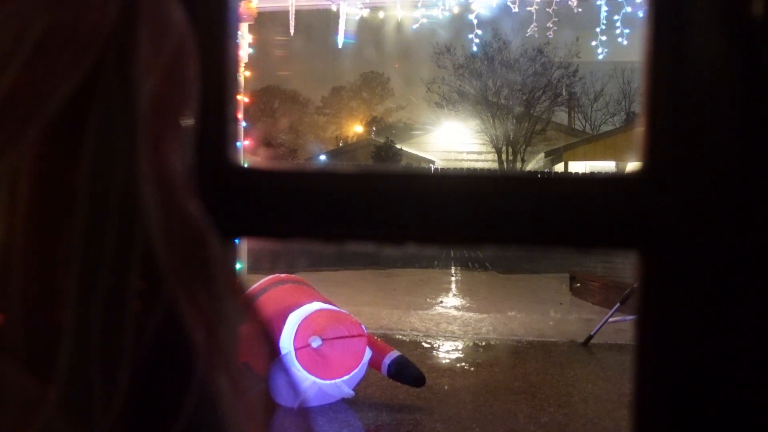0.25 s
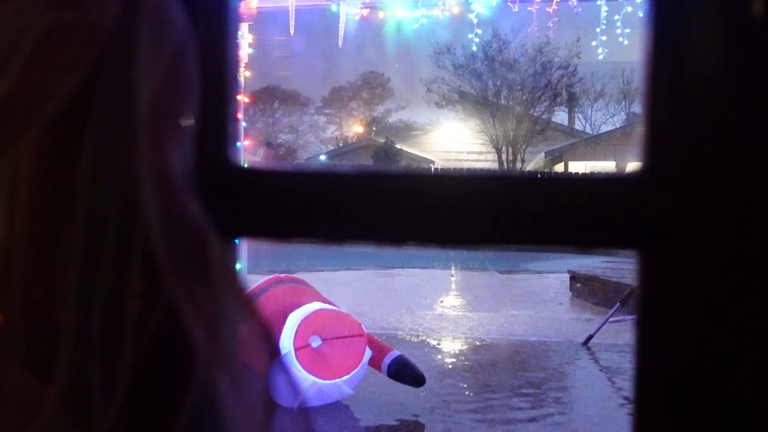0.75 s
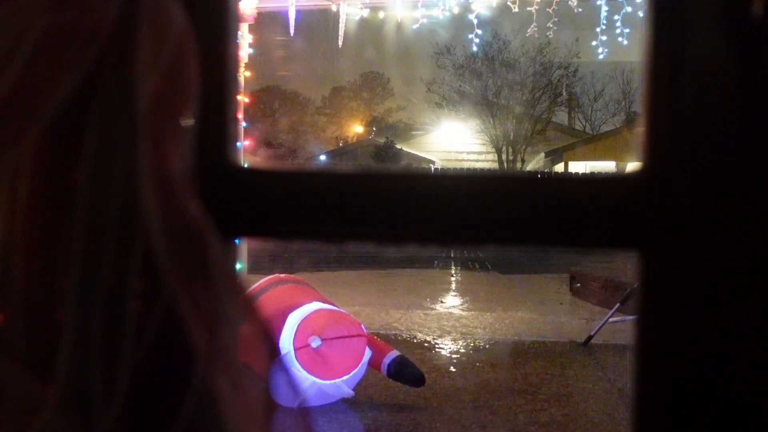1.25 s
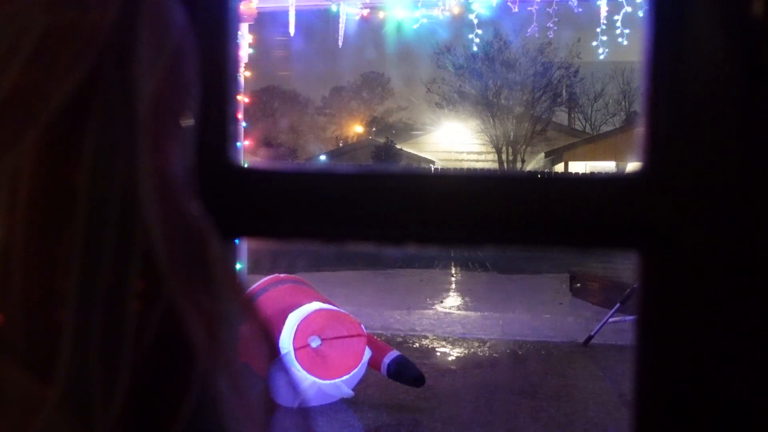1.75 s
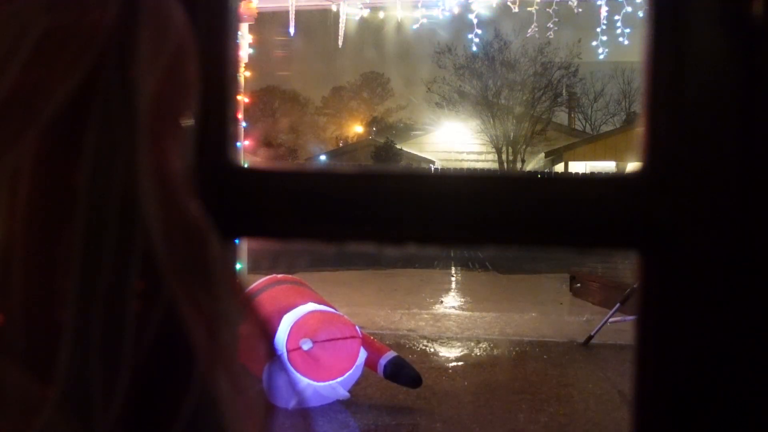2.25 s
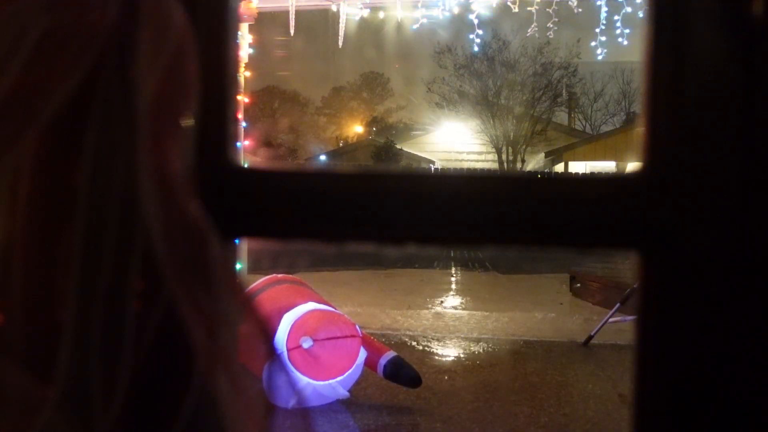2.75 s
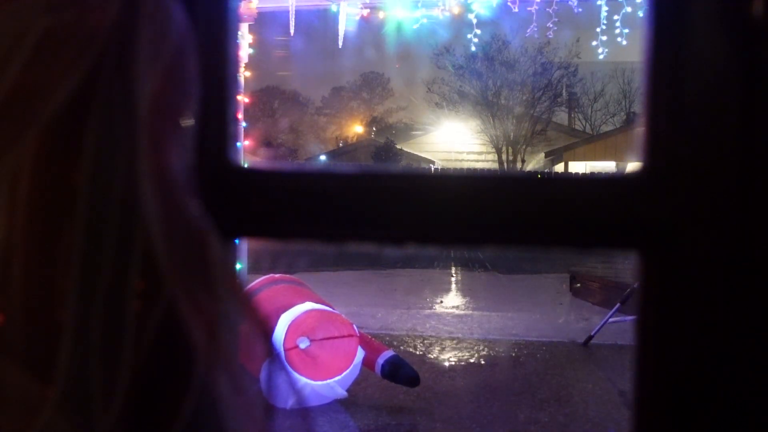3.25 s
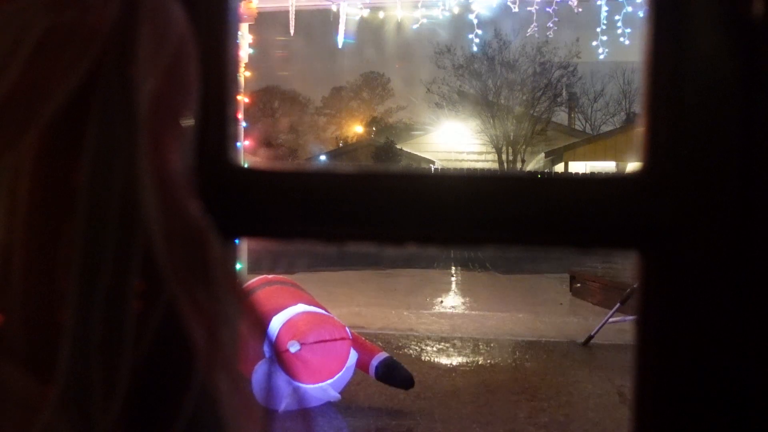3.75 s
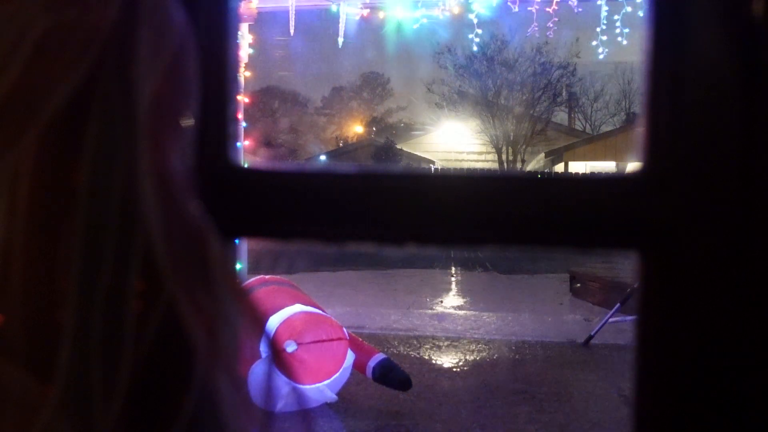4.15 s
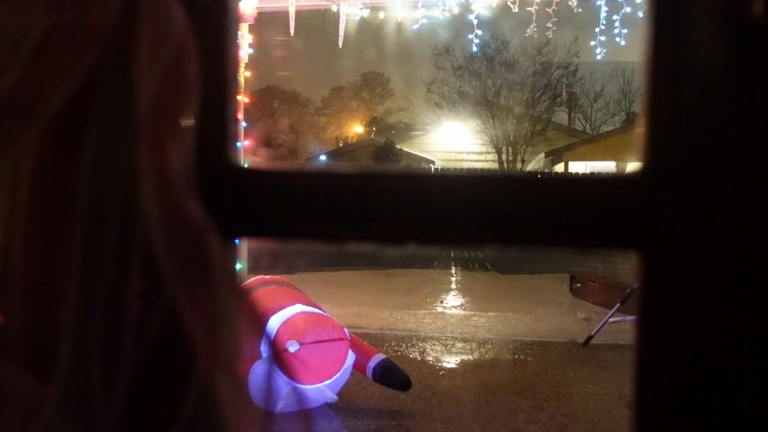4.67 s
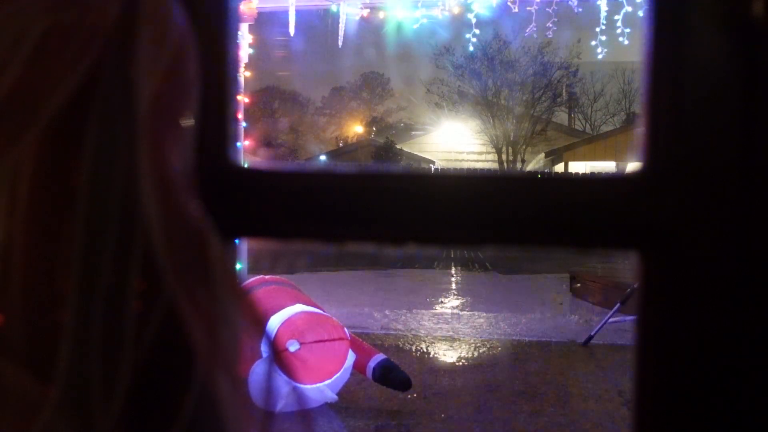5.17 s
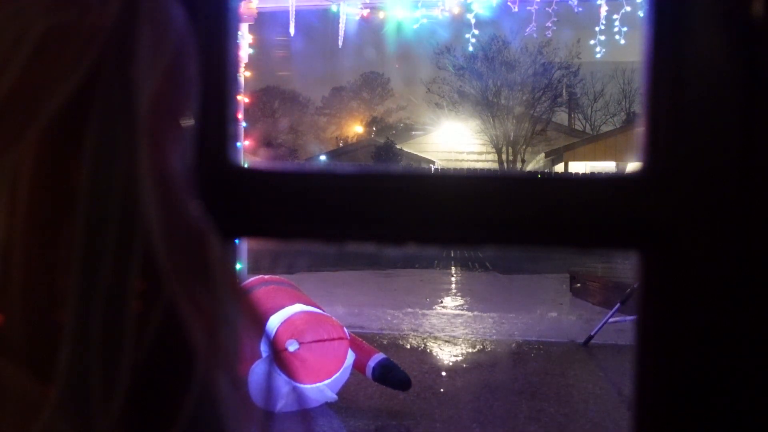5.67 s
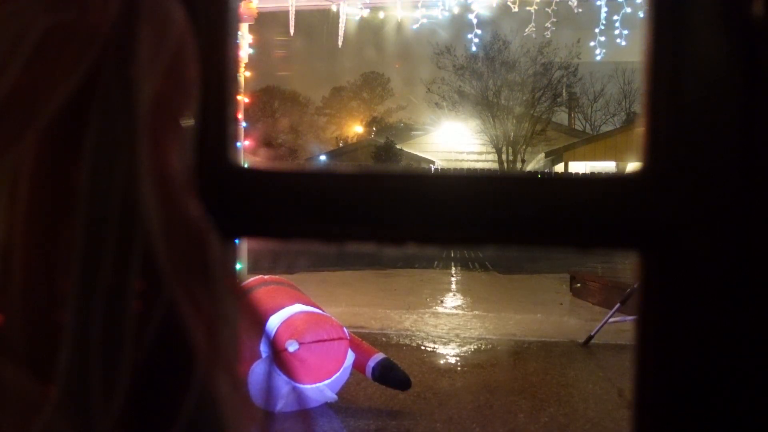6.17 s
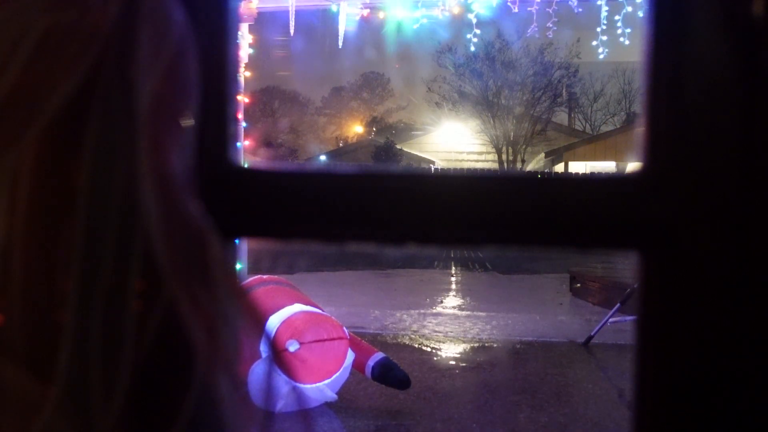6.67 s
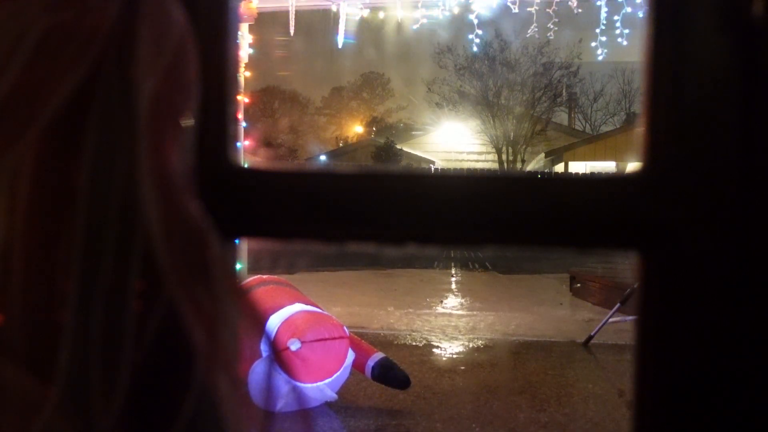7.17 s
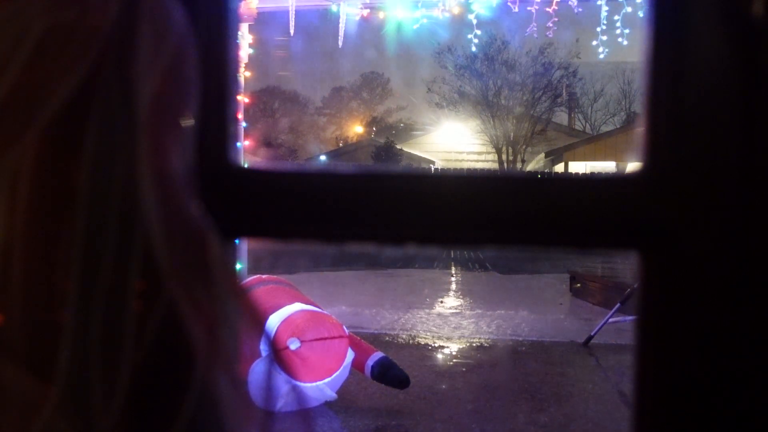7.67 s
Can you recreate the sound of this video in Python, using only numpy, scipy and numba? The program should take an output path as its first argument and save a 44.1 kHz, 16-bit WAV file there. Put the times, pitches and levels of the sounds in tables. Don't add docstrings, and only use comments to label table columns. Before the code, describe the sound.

From indoors, a steady downpour fizzes behind glass while close drops splat and plop, a faint fan hums, and far thunder rolls softly.

```python
import sys
import numpy as np
from scipy import signal
from scipy.fft import rfft, irfft
from scipy.io import wavfile
from scipy.ndimage import uniform_filter1d
from numba import njit

SR = 44100
rng = np.random.default_rng(int(sys.argv[2]) if len(sys.argv) > 2 else 0)


def magnitude_from_level(level_db):
    exponent = np.asarray(level_db, float) / 20
    return 10 ** exponent


def wrap_up_sound(samples):
    columns = np.atleast_2d(samples).T
    tamed = np.clip(columns, -1, 1)
    steps = np.round(tamed * 32767).astype(np.int16)
    wavfile.write(sys.argv[1], SR, steps)


N = 349272
T = np.arange(N) / SR
HZ = np.maximum(np.arange(N // 2 + 1) * SR / N, 1)

# (time [s], strength [dB], heaviness of the drops [dB])
DOWNPOUR = [(0, -42, -3.5), (.4, -43, -3.5), (.8, -44, -1), (1.3, -42, -4), (1.8, -44, -2.5),
            (2.3, -42.5, -3), (2.9, -44, -2.5), (3.3, -43, -4), (3.8, -42.5, -3.5), (4.3, -42, -3),
            (5, -44, -2), (5.4, -42.5, -3.5), (5.75, -44, -3), (6.15, -42, -4.5), (6.8, -44, -5),
            (7.15, -43, -4), (7.4, -44, -4), (7.92, -43, -4)]
# (time [s], peak [dB], low ring [Hz], high ring [Hz])
SILL_DRIPS = [
    (3.9725, -29, 2400, 3950),
    (4.6820, -19.5, 2350, 4600),
    (5.3172, -23, 3350, 4900),
]


def level(x, db):
    return x * magnitude_from_level(db) / np.sqrt(np.mean(x ** 2))


def curve(table):
    s, *columns = np.transpose(table)
    return [np.interp(T, s, c) for c in columns]


def shape(points, hz=HZ):
    f, db = np.transpose(points)
    return np.interp(np.log(hz), np.log(f), db)


def colour(x, gain):
    return irfft(rfft(x) * gain, N)


def walk(rate):
    hold = int(SR / rate)
    w = np.repeat(rng.standard_normal(N // hold + 1), hold)
    w = uniform_filter1d(uniform_filter1d(w, hold), hold)[:N]
    return w / w.std()


def bands(x, cross_hz, levels_db):
    edges = [0] + [1 / (1 + (HZ / f) ** 12) for f in cross_hz] + [1]
    spectrum = rfft(x)
    out = np.zeros(N)
    for below, above, db in zip(edges, edges[1:], levels_db):
        band = irfft(spectrum * (above - below), N)
        out += level(band, 0) * magnitude_from_level(db)
    return out


@njit
def grains(start, hz, cycles, glide, size):
    out = np.zeros(N)
    for k in range(len(start)):
        w = 2 * np.pi * hz[k] / SR
        n = cycles[k] * SR / hz[k]
        fade, rise = np.exp(-1 / n), glide[k] ** (1 / n)
        phase, a = 0., size[k]
        for i in range(int(start[k]), min(N, int(start[k] + 5 * n))):
            phase += w
            w = min(w * rise, 3.)
            a *= fade
            out[i] += a * np.sin(phase)
    return out


def drops(count, lo_hz, hi_hz, cycles, glide, scatter_db):
    when, pitch, bigness, ring = rng.random((count, 4)).T
    hz = lo_hz + (hi_hz - lo_hz) * pitch
    extra_db = np.minimum(-scatter_db * np.log(1 - bigness), 9)
    size = magnitude_from_level(extra_db) * np.sqrt(hz)
    return level(grains(when * N, hz, cycles * (.5 + ring), glide + 0 * hz, size), 0)


def door():
    # (frequency [Hz], level [dB per Hz])
    passed = [(470, -50.5), (800, -15.5), (1080, -16.5), (1350, -10.5), (1490, -9), (2190, -2.5),
              (2420, -2), (3700, 1.5), (4870, 3.5), (8960, 4), (15700, -14)]
    # (frequency [Hz], width [Hz], gain [dB])
    resonances = [(1380, 26, 4.5), (1780, 34, 1), (1850, 13, 5), (2170, 60, 3), (2260, 44, 4.5),
                  (2935, 69, 3), (2430, 110, 5), (2710, 126, 5.5), (3088, 43, 5.5), (3280, 114, 6),
                  (3960, 28, 1.5), (4630, 150, -0.5), (4940, 220, 0.5), (5340, 200, -1)]
    hz = np.maximum(np.arange(2049) * SR / 4096, 1)
    db = shape(passed, hz)
    for f, width, gain_db in resonances:
        db = db + gain_db / (1 + (2 * (hz - f) / width) ** 2)
    cep = irfft(db * np.log(10) / 20)
    cep[1:2048] *= 2
    cep[2049:] = 0
    return irfft(np.exp(rfft(cep)))[:2048]


def sheets():
    # (time [s], swell [dB])
    gusts = [(0.07, 2), (0.72, 3), (1.38, 2.5), (1.88, 4), (2.2, 0.5), (2.83, 2), (3.08, 2.5), (3.47, 5),
             (7.68, 1), (6.86, 4), (3.66, -1), (4.18, 1.5), (4.68, 5.5), (4.93, 7), (5.07, 9), (5.32, 3.5),
             (5.79, 4), (6.46, 3.5), (7.05, 8)]
    rise_s, fall_s = 0.014, 0.048
    swell_db = np.zeros(N)
    for s, db in gusts:
        age = np.maximum(T - s, 0)
        swell_db += db * (1 - np.exp(-age / rise_s)) * np.exp(-age / fall_s)
    return swell_db


def rain(glass):
    hiss = rng.standard_normal(N)
    fizz = drops(count=14000, lo_hz=1044, hi_hz=14900, cycles=2.7, glide=1.023, scatter_db=2.5)
    bubbles = drops(count=3000, lo_hz=1190, hi_hz=6040, cycles=7.7, glide=1.05, scatter_db=4.5)
    outdoors = hiss + magnitude_from_level(-9.0) * fizz + magnitude_from_level(-15) * bubbles
    indoors = signal.fftconvolve(outdoors, glass)[:N]
    strength_db, heavy_db = curve(DOWNPOUR)
    gust_db = sheets()
    steady_db = -43
    patter_db = strength_db + heavy_db + 0.63 * gust_db - 0.3 + .6 * walk(36) + 0.66 * walk(9)
    middle_db = strength_db - 1.6 + 0.5 * gust_db + .5 * walk(24) + 0.41 * walk(9)
    spray_db = -49.5 + 0.89 * gust_db + 1.33 * (strength_db - steady_db) + 0.5 * walk(32) + 0.55 * walk(8)
    flicker = magnitude_from_level(0.56 * walk(36) + 0.39 * walk(70))
    return flicker * bands(indoors, (2600, 6000), (patter_db, middle_db, spray_db))


def rumble():
    # (time [s], deep roll [dB], how hard it shakes the roof [dB])
    rolls = [(0, -65, 0), (.95, -61, 0), (1.2, -64, -1.5), (2.2, -67, -0.5), (2.72, -70, 5.5),
             (2.82, -55, 1), (3.25, -51, 7), (3.6, -54, 5), (3.9, -50, 6), (4.15, -57, 1), (4.4, -52, 0.5),
             (4.6, -62, 5.5), (5.15, -56, 1.5), (5.4, -65, -2), (5.8, -60, -5), (6.08, -55, 3.5),
             (6.35, -59, -1), (7.92, -67, -7)]
    # (frequency [Hz], level [dB per Hz])
    low_end = [(18, -48), (36, -35), (46, -22.5), (64, -21), (77, -10.5), (140, -5), (183, -9), (235, -1.5),
               (290, -3.5), (390, -15), (445, -10.5), (700, -15.5), (1000, -26.5), (1500, -35.5)]
    roll_db, shake_db = curve(rolls)
    heavy_db = curve(DOWNPOUR)[1]
    steady_db = -58
    noise = colour(rng.standard_normal(N), magnitude_from_level(shape(low_end)))
    deep_db = roll_db - .6 + 1.5 * walk(6)
    thunder_db = -53 + 0.82 * shake_db + .1 * (roll_db - steady_db) + 1.0 * walk(7.7)
    roof_db = -50.0 + .45 * shake_db + .5 * walk(12)
    street_db = -57.5 - 0.13 * shake_db + 0.98 * heavy_db + 0.42 * walk(4.3)
    return bands(noise, (92, 165, 420), (deep_db, thunder_db, roof_db, street_db))


def fan():
    fan_hz, width_hz = 155, 6.5
    air = colour(rng.standard_normal(N), 1 / (1 + ((HZ - fan_hz) / width_hz) ** 2))
    tone = np.sin(2 * np.pi * fan_hz * T) * magnitude_from_level(1.1 * walk(3.66))
    return level(level(air, 0) + magnitude_from_level(4) * tone, -55)


def splashes(table, count, cycles, glide, spread_oct, trim_db, burst_s):
    s, peak_db, hz = np.transpose(table)[:, :, None]
    c = rng.random((len(s), count, 2))
    c[:, 0] = 0, .5
    delay, detune = c[..., 0], c[..., 1]
    drip_s = np.transpose(SILL_DRIPS)[0]
    on_sill = abs(s - drip_s).min(axis=1, keepdims=True) < .003
    peak_db = peak_db - 8 * on_sill
    late = delay ** 1.1 * burst_s + .0006
    pitch = hz * 2 ** (spread_oct * (detune - .5))
    size = magnitude_from_level(peak_db + trim_db - 17.0 * delay).ravel()
    return grains((s + late).ravel() * SR, pitch.ravel(), cycles + 0 * size, glide + 0 * size, size)


def lesser(count, top_db, range_db, lo_hz, hi_hz):
    when, softness, pitch = rng.random((count, 3)).T
    s = when * (N - SR // 20) / SR
    return np.transpose([s, top_db - range_db * softness, lo_hz * (hi_hz / lo_hz) ** pitch])


def splats():
    # (time [s], peak [dB], centre [Hz])
    bursts = [(0.2543, -27.5, 3910), (0.6769, -22, 4800), (0.7627, -23, 3960), (1.2286, -27, 3930),
              (0.1, -22, 3300), (1.8826, -32, 5250), (2.2917, -25, 3980), (2.8604, -19, 4730),
              (3.1308, -22, 3700), (3.4845, -19.5, 4450), (3.6532, -21.5, 3370), (3.875, -22, 3960),
              (3.973, -9, 3920), (4.0612, -20, 4540), (4.1824, -22, 4470), (4.4333, -21, 3950),
              (4.6808, -9, 4360), (4.7202, -20, 4800), (4.8678, -22, 3080), (4.9516, -22, 3330),
              (5.0058, -27, 3330), (5.3168, -11, 4300), (5.4111, -15, 5950), (5.5972, -21, 4440),
              (6.336, -20, 4800), (6.467, -31, 3090), (7.1821, -18.5, 5260), (7.0753, -22, 3100),
              (7.7011, -23.5, 3460), (7.7209, -20, 5240)]
    paving = np.vstack([bursts, lesser(count=28, top_db=-31, range_db=31, lo_hz=2940, hi_hz=5200)])
    return splashes(paving, count=16, cycles=2.6, glide=0.93, spread_oct=0.58, trim_db=-10, burst_s=.015)


def gulps():
    # (time [s], peak [dB], bubble pitch [Hz])
    deep = [(0.247, -32, 1700), (0.2922, -35, 2430), (0.315, -33, 1950), (0.7093, -37, 1790),
            (0.7567, -38, 1850), (1.288, -31, 1960), (1.348, -32.5, 1850), (1.8312, -31, 1800),
            (1.931, -27.5, 1780), (1.9689, -36, 1660), (3.0425, -30, 1380), (3.0776, -34, 1700),
            (4.9766, -31, 1940), (5.1183, -35, 1970), (7.1, -37, 2250)]
    return splashes(deep, count=5, cycles=4.8, glide=1.04, spread_oct=0.53, trim_db=-4.5, burst_s=.021)


def plops():
    # (time [s], peak [dB], bubble pitch [Hz])
    shallow = [(0.4708, -24, 2380), (0.6918, -24, 2260), (1.077, -21, 2430), (1.3159, -22.5, 2500),
               (1.4875, -21, 2500), (1.5434, -19.5, 2430), (1.8317, -25, 2130), (1.8841, -26, 2190),
               (2.0303, -20, 2330), (2.2258, -28, 2260), (2.3191, -19, 2330), (2.8095, -22, 2420),
               (2.9302, -22, 2260), (3.0764, -23, 2210), (3.2395, -20, 2420), (3.8267, -23, 2500),
               (4.1031, -28, 2400), (4.1869, -18.5, 2200), (4.2762, -23.5, 2170), (4.9726, -27, 2030),
               (5.0055, -18, 2460), (5.3368, -20, 2430), (5.4665, -20, 2560), (5.67, -23, 2480),
               (5.7833, -19.5, 2160), (6.133, -20, 2870), (6.1569, -22, 2710), (6.5969, -23, 2710),
               (7.5343, -22, 2450), (7.867, -21, 2380)]
    puddle = np.vstack([shallow, lesser(count=70, top_db=-26, range_db=10, lo_hz=2160, hi_hz=2750)])
    return splashes(puddle, count=8, cycles=4.3, glide=1.02, spread_oct=0.35, trim_db=-11.5, burst_s=.022)


def drips():
    s, peak_db, low_hz, high_hz = np.transpose(SILL_DRIPS)
    low = grains(s * SR, low_hz, 2.2 + 0 * s, 1 + 0 * s, magnitude_from_level(peak_db))
    high = grains(s * SR, high_hz, 2.8 + 0 * s, 1 + 0 * s, magnitude_from_level(peak_db - 2.5))
    return low + high


def porch(x, echo_s=.0041, echo_db=-3, tail_db=-4, t60=.1):
    t = T[:SR // 4]
    wash = rng.standard_normal(len(t)) * magnitude_from_level(-60 * t / t60) * np.minimum(t / 0.0013, 1)
    reply = magnitude_from_level(tail_db) * wash / np.sqrt(np.sum(wash ** 2))
    reply[0] += 1
    reply[int(echo_s * SR)] += magnitude_from_level(echo_db)
    return signal.fftconvolve(x, reply)[:N]


def near_drops():
    low_hz, high_hz = 1460, 6200
    heard = porch(plops() + splats() + gulps() + drips())
    return colour(heard, 1 / (1 + (low_hz / HZ) ** 6 + (HZ / high_hz) ** 4))


def scene():
    # (frequency [Hz], left minus right [dB])
    balance = [(60, .5), (200, .1), (700, -.5), (1290, -2), (2400, -2), (3400, -3), (11000, -3),
               (12500, -2), (14300, -1.5)]
    # (frequency [Hz], level under the shared sound [dB])
    differing = [(30, -21), (60, -22), (130, -17), (290, -13), (640, -6), (1100, -7.5), (2000, -18),
                 (3000, -22), (3500, -70), (10500, -70), (12500, -14.5)]
    shared = rain(door()) + near_drops() + rumble() + fan()
    room = rfft(rng.standard_normal(N) * np.exp(-T / 0.15))
    scramble = room / abs(room)
    diffuse = colour(shared, magnitude_from_level(shape(differing)) * scramble)
    lean = magnitude_from_level(shape(balance) / 2)
    return np.array([colour(shared + diffuse, lean), colour(shared - diffuse, 1 / lean)])


def roll_off(x):
    return signal.sosfilt(signal.butter(12, 16370, fs=SR, output="sos"), x)


def record(dry):
    hiss_db, hiss_from_hz = -61, 11000
    hiss = level(colour(rng.standard_normal(N), 1 / (1 + (hiss_from_hz / HZ) ** 6)), hiss_db)
    mid = colour(dry[0] + dry[1] + 2 * hiss, HZ < 15730) / 2
    side = colour(dry[0] - dry[1], HZ < 14300) / 2
    return roll_off(np.array([mid + side, mid - side]))


dry = scene()
out = record(dry)
wrap_up_sound(out)
```